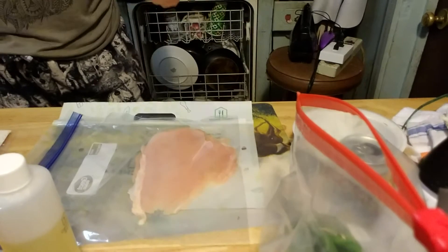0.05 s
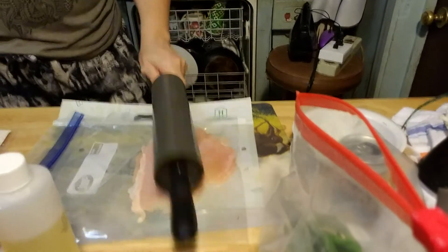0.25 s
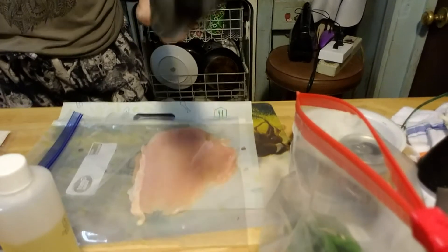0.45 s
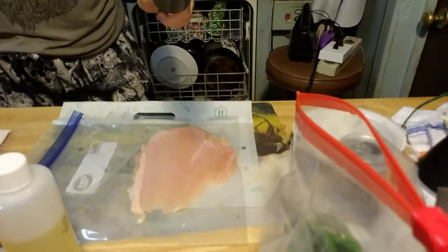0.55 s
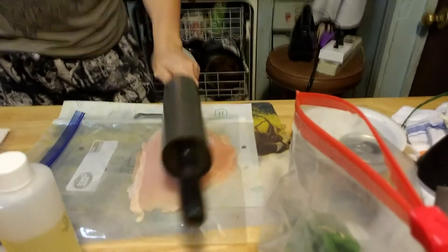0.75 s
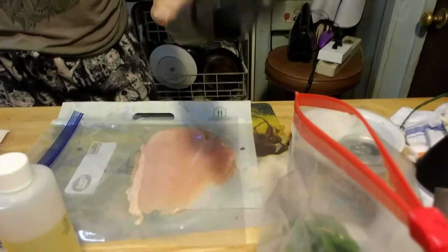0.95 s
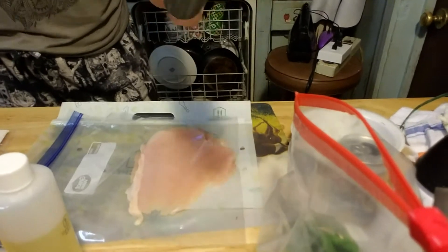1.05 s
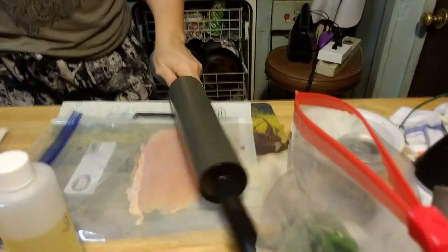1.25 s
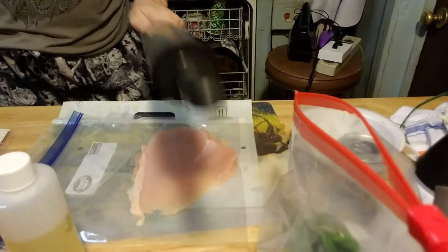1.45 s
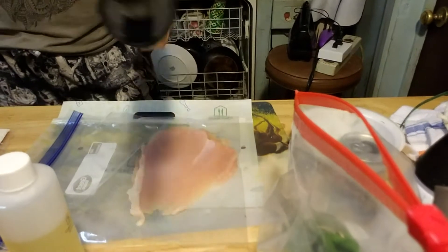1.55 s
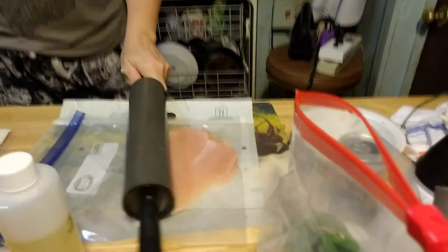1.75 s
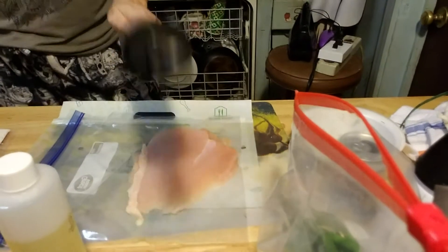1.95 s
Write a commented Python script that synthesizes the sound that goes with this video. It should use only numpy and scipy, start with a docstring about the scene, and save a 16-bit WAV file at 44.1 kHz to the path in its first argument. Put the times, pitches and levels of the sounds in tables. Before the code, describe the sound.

A rolling pin pounds raw meat in a plastic bag, four steady, slapping thuds.

```python
"""A heavy rolling pin pounds raw chicken in a plastic bag on a kitchen counter, four steady blows. Each blow
cracks the film, slaps the wet meat and pushes board and counter into a low thud. Trapped air pops, pin and
board ring, the small kitchen answers and loose things rattle. Between the blows the bag rustles and ticks
faintly and loose things click, over room tone and an appliance hum."""
import sys
import numpy as np
from scipy import signal
from scipy.fft import rfft, irfft
from scipy.io import wavfile

SR = 44100
rng = np.random.default_rng(int(sys.argv[2]) if len(sys.argv) > 2 else 0)


def pcm_store(signal):
    """Save signal as 16-bit PCM."""
    levels = np.round(np.clip(np.atleast_2d(signal), -1, 1) * 32767)
    wavfile.write(sys.argv[1], SR, levels.astype(np.int16).T)


N = 88200
T = np.arange(N) / SR
HZ = np.maximum(np.fft.rfftfreq(N, 1 / SR), 1)

# Room tone. Each row: frequency in Hz, level in dB per octave band.
ROOM_TONE = [(30, -88), (90, -74.5), (170, -69.5), (320, -69.5), (420, -74), (1300, -83.5), (1750, -73),
             (2200, -85), (3000, -81), (6000, -94.5), (15000, -87)]
# Appliance hum. Each row: pitch in Hz, level in dB.
HUM_TONES = [(156, -69.5), (190, -70.5), (224, -77.5), (316, -69)]
# Swells of the bag. Each row: peak time in seconds, spread in seconds, gain in dB.
BAG_RUSTLES = [(.113, .027, -65), (.61, .04, -75), (.85, .03, -73), (1.135, .02, -66), (1.29, .04, -62),
               (1.60, .009, -69), (1.628, .005, -58), (1.645, .011, -63)]
# Colour of the loose film. Each row: frequency in Hz, level in dB per octave band.
FILM_COLOUR = [(1500, -18), (3500, -10), (6500, -6), (10000, -2), (15000, -2)]
# Resonances of the sliding film. Each row: centre in Hz, half width in Hz, boost in dB.
FILM_RESONANCES = [(3500, 160, 9), (6580, 130, 12), (9500, 450, 7), (13100, 500, 3)]
# Single short ticks: most from the film, those near .321, .712 and 1.7245 s are loose things clicking. Each
# row: start in seconds, level in dB, centre in Hz.
TICKS = [(.2025, -60, 7050), (.321, -54, 11100), (.5535, -63, 11950), (0.584, -60.5, 8140),
         (.599, -60, 7000), (0.64, -58, 11200), (.6862, -48, 2600), (.6935, -42, 2536),
         (.712, -36, 9000), (1.429, -65, 11900), (1.7245, -43, 10000)]
# The blows. Each row: first touch in seconds, time to the peak push in ms, thud gain in dB,
# contact softness in ms, slap and room gain in dB, smack boost in dB, smack and pop pitch in Hz,
# then the gains of crack, ring, pop and rattle in dB.
PIN_BLOWS = [(0.2179, 2.47, 1, 1.043, 2, 2.5, 685, -6, -0.5, -22.5, 0),
             (0.6962, 4.13, -3.5, 1, 1.5, 2.5, 1290, -7, 4.5, -10, -1),
             (1.185, 3.064, -2.5, 1.044, 5.5, 4, 774, 2.5, 4.5, -1, 4.5),
             (1.665, 4.43, 2.5, 1.26, 0.5, 3.5, 410, -1.5, -6, -15, 1)]
# Snap of the film. Each row: frequency in Hz, level in dB per octave band.
CRACK_COLOUR = [(800, -39.5), (3000, -28), (7000, -32), (12000, -24), (16000, -30)]
# Bag on wet meat. Each row: frequency in Hz, level in dB per octave band before smack and low cut.
SLAP_COLOUR = [(200, -12.5), (400, -18.5), (800, -21.5), (1500, -18.5), (2100, -25), (3100, -24),
               (5000, -33), (9000, -39.5), (15000, -36)]
# Low modes of board and counter. Each row: pitch in Hz, level in dB, t60 in seconds, polarity.
COUNTER_MODES = [(83, -5, .13, -1), (101, 2, .09, 1), (140, -5, .14, 1), (154, -8.6, .27, -1),
                 (167, -11.4, .22, 1), (225, -14.6, .2, 1), (252, 2.5, .27, -1), (295, -9.3, .29, 1),
                 (317, -4, .23, -1), (413, 0, .18, -1)]
# Ring of pin and board. Each row: pitch in Hz, level in dB.
PIN_MODES = [(371, -29), (527, -26), (570, -24.5), (653, -26.5), (793, -38.5), (846, -38), (1017, -33),
             (1194, -31.5), (1349, -35.5), (1477, -38.5), (1679, -27), (2102, -39)]
# Kitchen reverb. Each row: frequency in Hz, level in dB per octave band, t60 in seconds.
REVERB_BANDS = [(35.58, -49.5, 0.46), (85, -27, 0.41), (182, -25.5, 0.42), (378, -25.5, 0.28),
                (750, -23, 0.27), (1560, -26.5, 0.3), (2100, -32, .33), (2870, -32, .33),
                (5300, -44.5, 0.33), (8600, -43.5, 0.26), (14000, -37, 0.23)]
# Chatter of loose things. Each row: frequency in Hz, level in dB per octave band.
RATTLE_COLOUR = [(600, -38), (1400, -27), (2800, -29.5), (4200, -37), (7000, -43.5), (14000, -50.5)]
# Their clinks. Each row: centre in Hz, half width in Hz, boost in dB.
RATTLE_RESONANCES = [(1670, 100, 6.5), (2580, 120, 6), (3090, 70, 5.5), (4110, 160, 11.5), (6600, 76, 5.5)]
# Stereo width of close and of diffuse sounds. Each row: frequency in Hz, side over mid in dB.
CLOSE_WIDTH = [(100, -22.5), (500, -5.5), (1500, -1), (12000, -1)]
DIFFUSE_WIDTH = [(80, -18), (250, -15), (600, -4.5), (1500, 0.5), (12000, 0)]
# Panning of the mix. Each row: frequency in Hz, left over right in dB.
PAN = [(50, 1.5), (250, -3), (500, -2), (1100, -2.5), (2200, -2), (4000, -0.4), (12000, 0)]


def undb(db):
    """Decibels to gain."""
    return 10 ** (np.asarray(db) / 20)


def curve(table, hz):
    """Reads a table's levels along log frequency."""
    rows = np.array(table, float)
    return np.interp(np.log(hz), np.log(rows[:, 0]), rows[:, 1])


def boost(peaks):
    """Resonant peaks as an EQ curve in dB."""
    return sum(db / (1 + ((HZ - hz) / half_width) ** 2) for hz, half_width, db in peaks)


def noise(db, width, grain_db=0):
    """Stereo noise with the given level per octave; grain breaks it into crackles."""
    grains = undb(grain_db * np.repeat(rng.standard_normal(N // 20 + 1), 20)[:N])
    mid, side = rfft(rng.standard_normal((2, N)) * grains / np.sqrt(np.mean(grains ** 2)))
    pair = mid + side * undb(curve(width, HZ)) * np.array([[1], [-1]])
    return irfft(pair * undb(db) * np.sqrt(SR / 2 / HZ / np.log(2)), N)


def burst(start, rise_s, t60_s):
    """Quick attack, exponential tail."""
    age = np.maximum(T - start, 0)
    return (1 - np.exp(-age / rise_s)) * np.exp(-np.log(1000) * age / t60_s)


def mode(hz, t60_s, start=0):
    """One decaying resonance."""
    age = np.maximum(T - start, 0)
    return np.sin(2 * np.pi * hz * age) * np.exp(-np.log(1000) * age / t60_s)


def room_tone():
    """A bed of still air and faint appliance hum."""
    hum = sum(undb(db) * np.sin(2 * np.pi * (hz * T + rng.random())) for hz, db in HUM_TONES)
    return noise(curve(ROOM_TONE, HZ), DIFFUSE_WIDTH) + hum


def bag_rustle():
    """The film slides, rustles and ticks as it settles around the blows, and loose things click now and then."""
    swells = sum(undb(db) * np.exp(-((T - peak) / spread) ** 2 / 2) for peak, spread, db in BAG_RUSTLES)
    colour = curve(FILM_COLOUR, HZ) + boost(FILM_RESONANCES)
    out = noise(colour, DIFFUSE_WIDTH, grain_db=5) * swells
    for start, db, hz in TICKS:
        tick_colour = db - 3 * np.log2(HZ / hz) ** 2
        out += noise(tick_colour, CLOSE_WIDTH) * burst(start, rise_s=.0004, t60_s=.025)
    return out


def film_crack(start):
    """The film snaps as the pin first touches it."""
    snap = noise(curve(CRACK_COLOUR, HZ), CLOSE_WIDTH, grain_db=1)
    return snap * burst(start, rise_s=.00028, t60_s=.019)


def smack(hz, db, centre_hz, octaves=.9):
    """A flat landing squeezes out trapped air and lifts the mids: a bell curve in dB."""
    return db * np.exp(-(np.log2(hz / centre_hz) / octaves) ** 2 / 2)


def meat_slap(start, smack_db, smack_hz):
    """The wet, grainy slap of the bag on the meat."""
    low_cut_db = 20 * np.log10(1 + (150 / HZ) ** 2)
    colour = curve(SLAP_COLOUR, HZ) + smack(HZ, smack_db, smack_hz) - low_cut_db
    return noise(colour, CLOSE_WIDTH, grain_db=2.5) * burst(start + .0018, rise_s=.003, t60_s=.1)


def counter_thud(peak_s, soft_s):
    """The meat cushions the pin into a smooth push that swings board and counter."""
    push = np.exp(-((T - peak_s) / soft_s) ** 2 / 2)
    body = sum(np.sign(polarity) * undb(db) * mode(hz, t60) for hz, db, t60, polarity in COUNTER_MODES)
    swing = signal.fftconvolve(push / push.sum(), body)[:N]
    low_cut = signal.butter(1, 40, "high", fs=SR, output="sos")  # they radiate little deep bass
    return signal.sosfilt(low_cut, swing)


def air_pop(start, hz):
    """A few sharp cycles as the pocket of air under the bag bursts out."""
    return mode(hz, t60_s=.01, start=start)


def pin_ring(start, smack_db, smack_hz, t60_s=.19, lag_s=.00012):
    """Pin and board ring, lifted around the smack, a little differently each blow and on each side."""
    out = 0
    for (hz, db), (detune, *lags) in zip(PIN_MODES, rng.standard_normal((len(PIN_MODES), 3))):
        onset = start + rng.random() / hz
        pitch = hz * (1 + .0022 * detune)
        pair = np.array([mode(pitch, t60_s, onset + lag_s * lag) for lag in lags])
        out += undb(db + smack(hz, smack_db, smack_hz)) * pair
    return out


def kitchen_reverb(start, smack_db, smack_hz):
    """The diffuse answer of the room; the bass lingers longest."""
    colour = curve(REVERB_BANDS, HZ) + smack(HZ, smack_db, smack_hz)
    wash = rfft(noise(colour, DIFFUSE_WIDTH, grain_db=1))
    centres = np.log([row[0] for row in REVERB_BANDS])
    out = 0
    for solo, (_, _, t60) in zip(np.eye(len(REVERB_BANDS)), REVERB_BANDS):
        band = irfft(wash * np.interp(np.log(HZ), centres, solo), N)
        out += band * burst(start + .006, rise_s=.022, t60_s=t60)
    return out


def counter_rattle(start):
    """Loose things jump, then chatter back onto the counter."""
    colour = curve(RATTLE_COLOUR, HZ) + boost(RATTLE_RESONANCES)
    return noise(colour, DIFFUSE_WIDTH, grain_db=3) * burst(start + .024, rise_s=.0097, t60_s=.17)


def scene():
    """Four blows over the quiet kitchen, sitting a little to the right."""
    out = room_tone() + bag_rustle()
    for (touch, press_ms, thud_db, soft_ms, slap_db, smack_db, smack_hz,
         crack_db, ring_db, pop_db, rattle_db) in PIN_BLOWS:
        pressed = touch + press_ms / 1000
        out += undb(crack_db) * film_crack(touch)
        out += undb(slap_db) * meat_slap(touch, smack_db, smack_hz)
        out += undb(thud_db) * counter_thud(pressed, soft_ms / 1000)
        out += undb(pop_db) * air_pop(pressed, smack_hz)
        out += undb(ring_db) * pin_ring(pressed, smack_db, smack_hz)
        out += undb(slap_db) * kitchen_reverb(touch, smack_db, smack_hz)
        out += undb(rattle_db) * counter_rattle(touch)
    pan = undb(curve(PAN, HZ) * np.array([[.5], [-.5]]))
    return irfft(rfft(out) * pan, N)


def record(dry, knee=10, top_hz=15900):
    """A soft clip rounds the highest peaks and a steep low-pass cuts the top."""
    rounded = dry / (1.5 + np.abs(dry) ** knee) ** (1 / knee)
    high_cut = signal.ellip(10, .2, 70, top_hz, fs=SR, output="sos")
    return signal.sosfilt(high_cut, rounded)


dry = scene()
out = record(dry)
pcm_store(out)
```